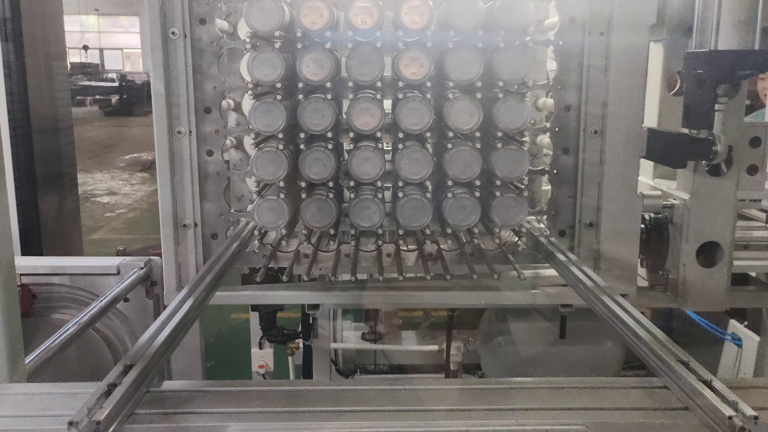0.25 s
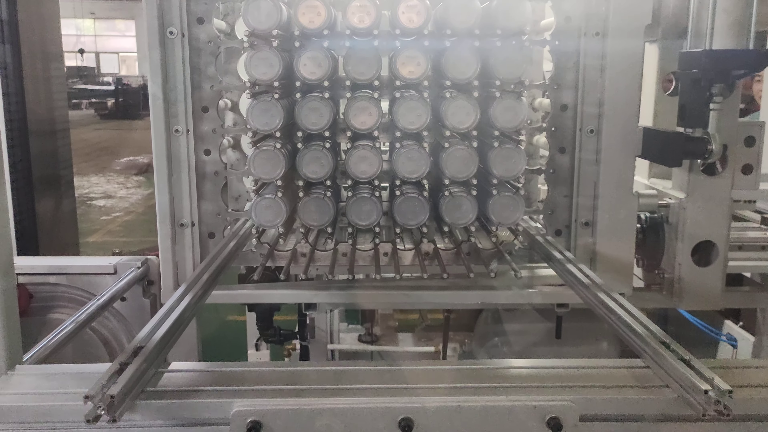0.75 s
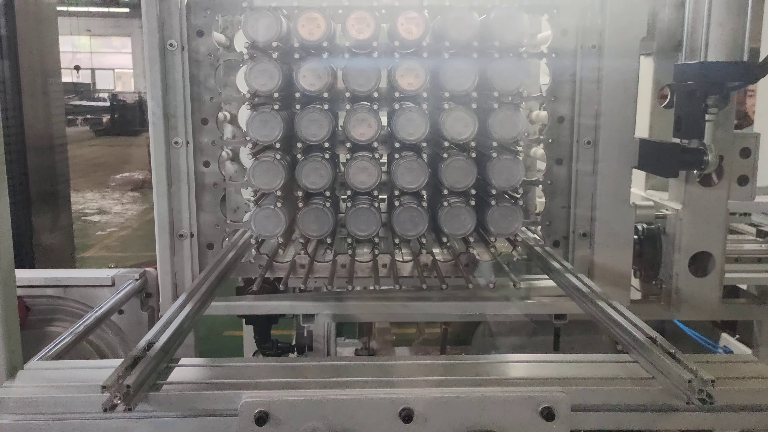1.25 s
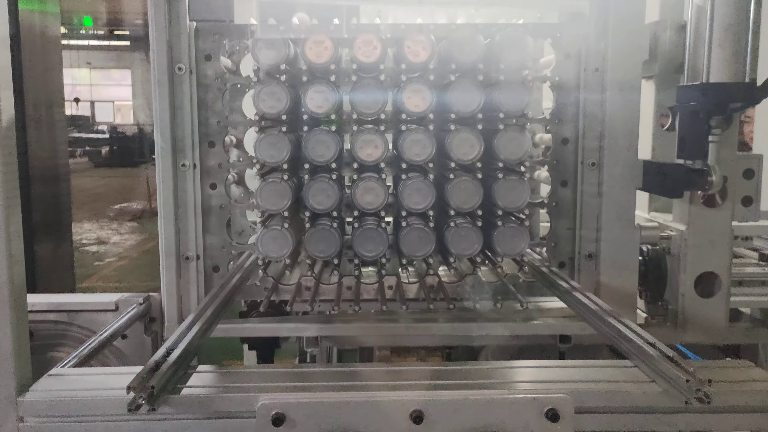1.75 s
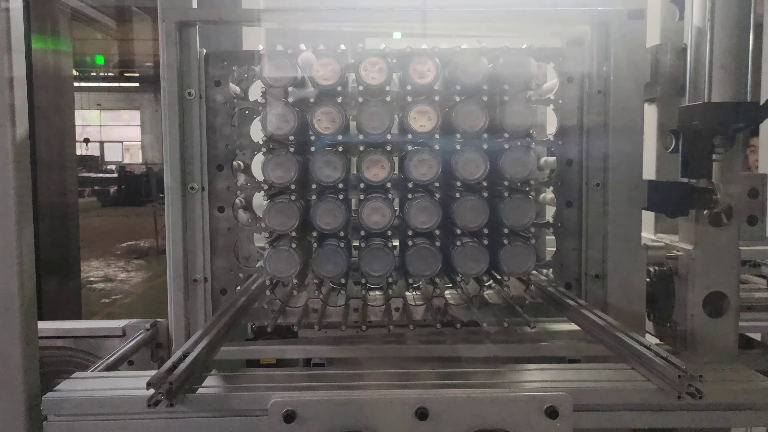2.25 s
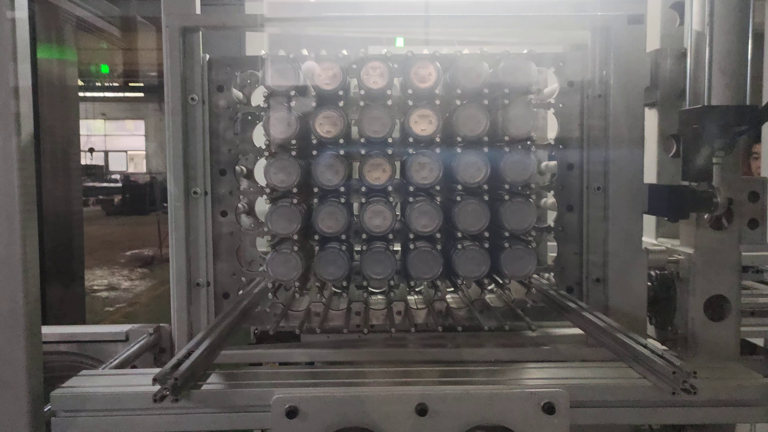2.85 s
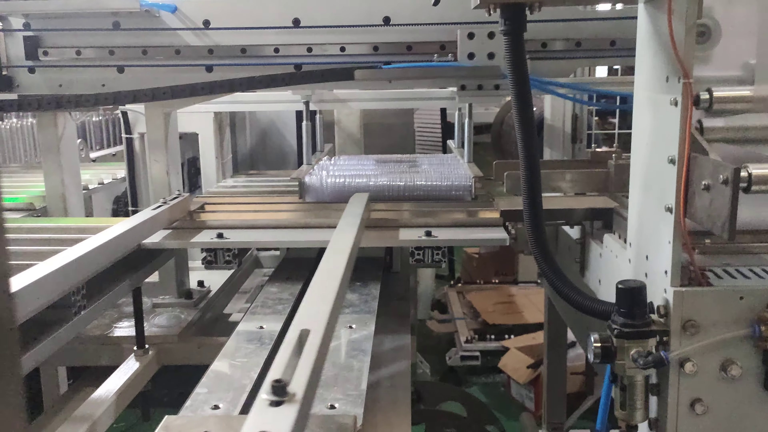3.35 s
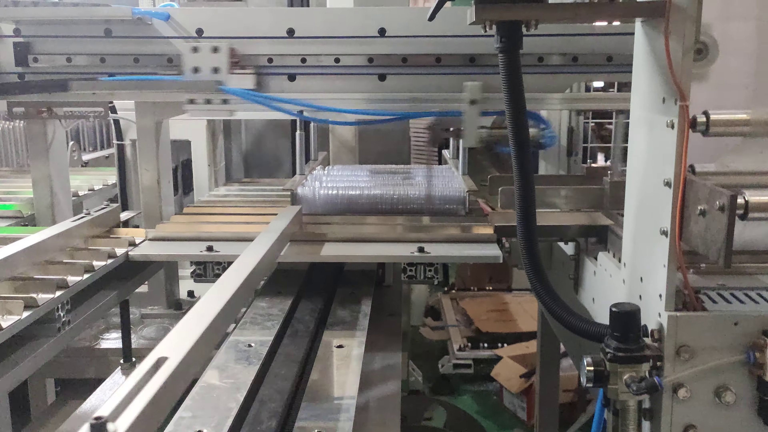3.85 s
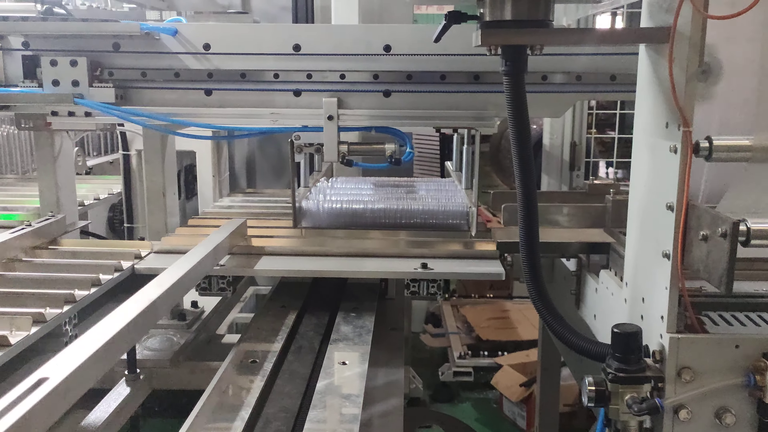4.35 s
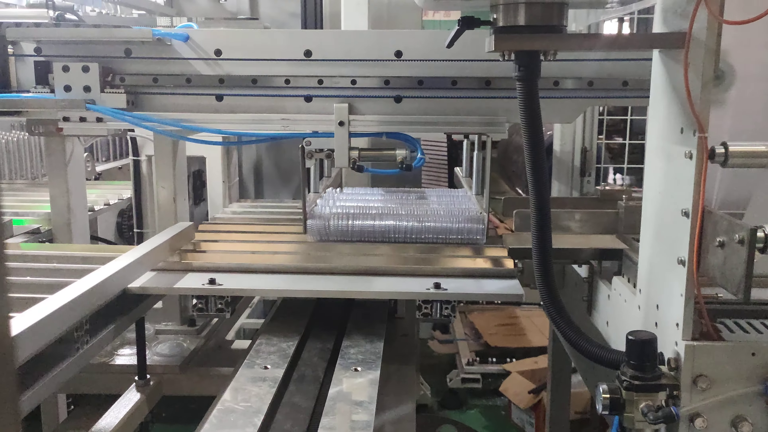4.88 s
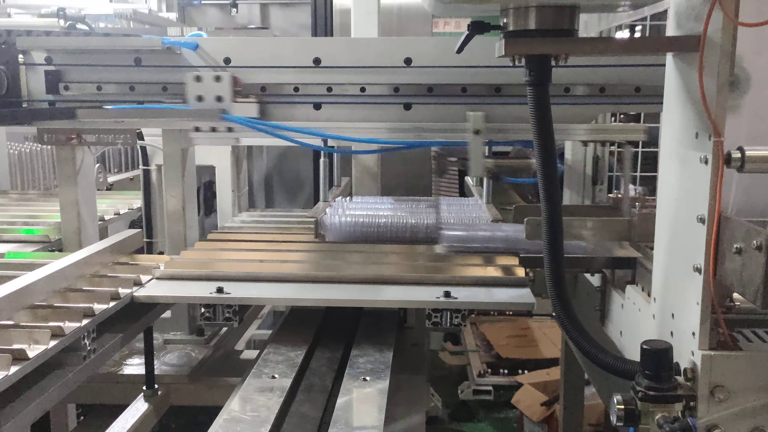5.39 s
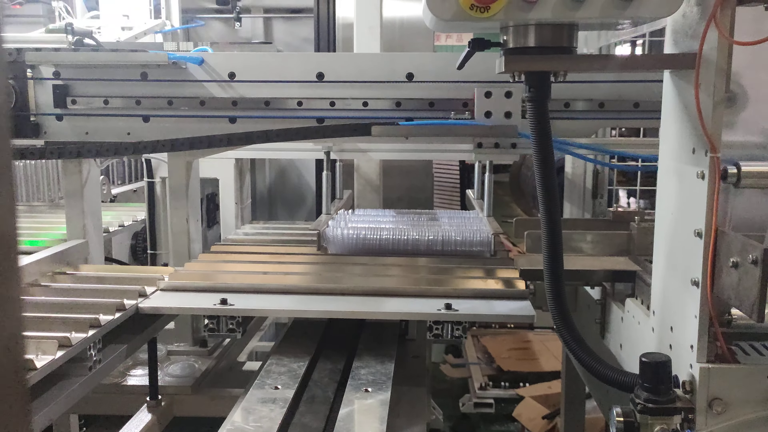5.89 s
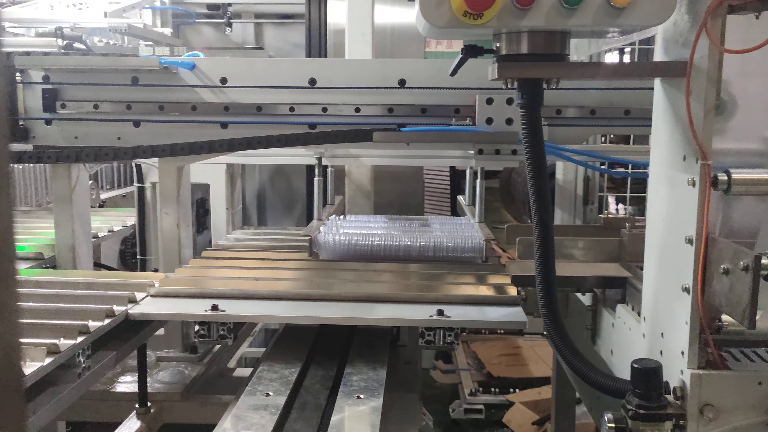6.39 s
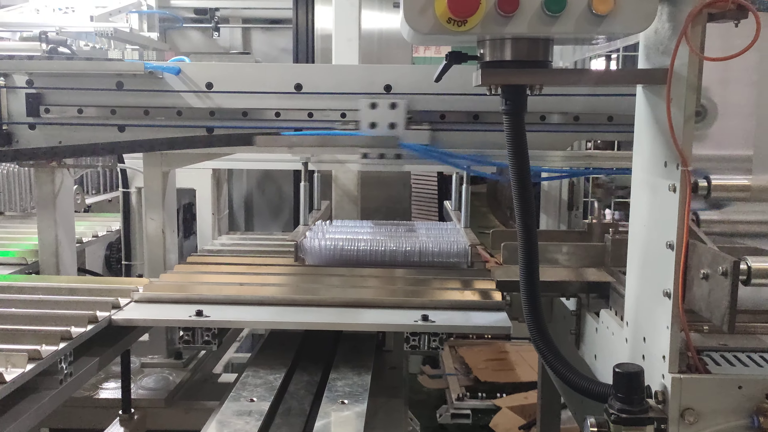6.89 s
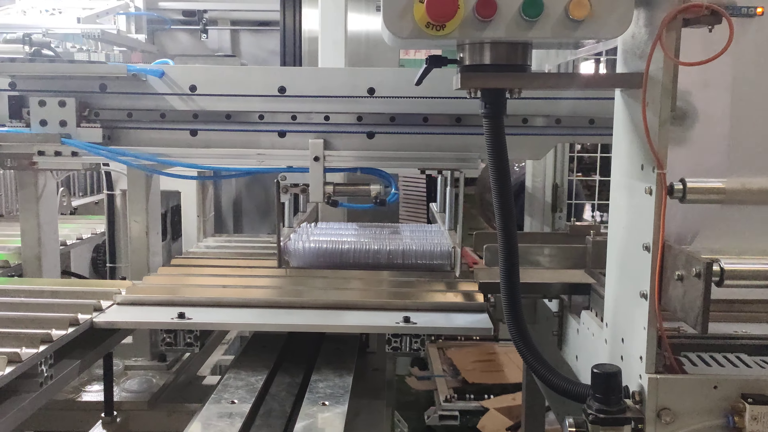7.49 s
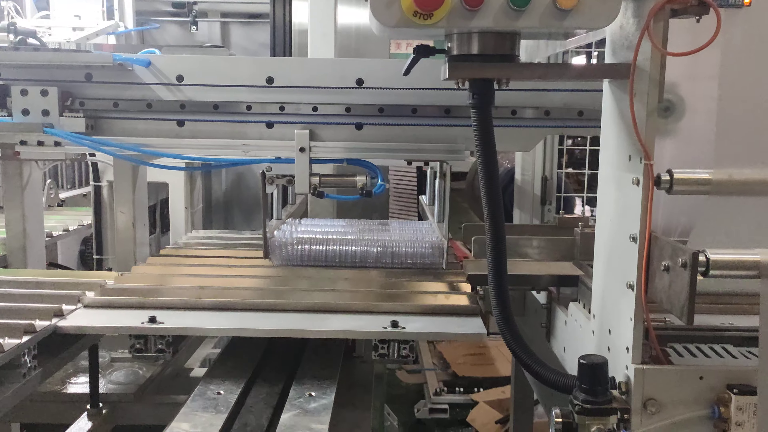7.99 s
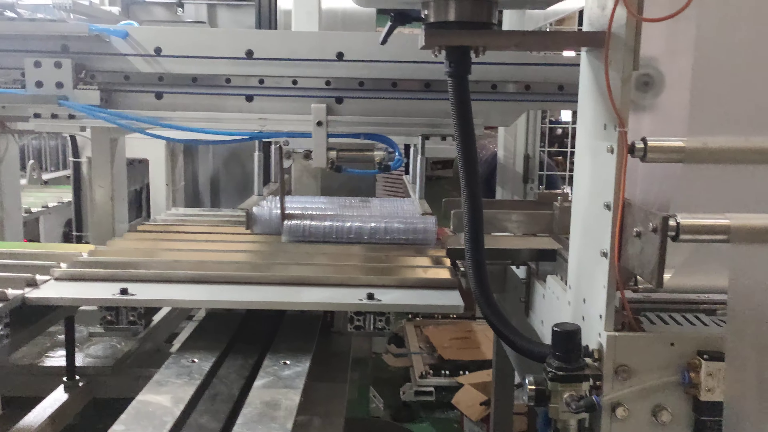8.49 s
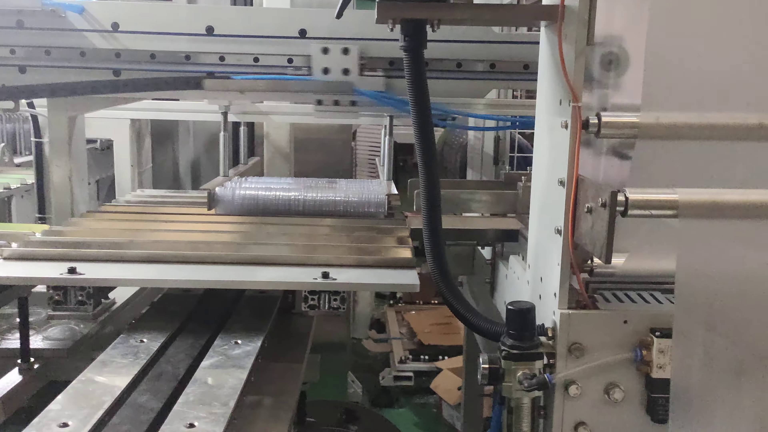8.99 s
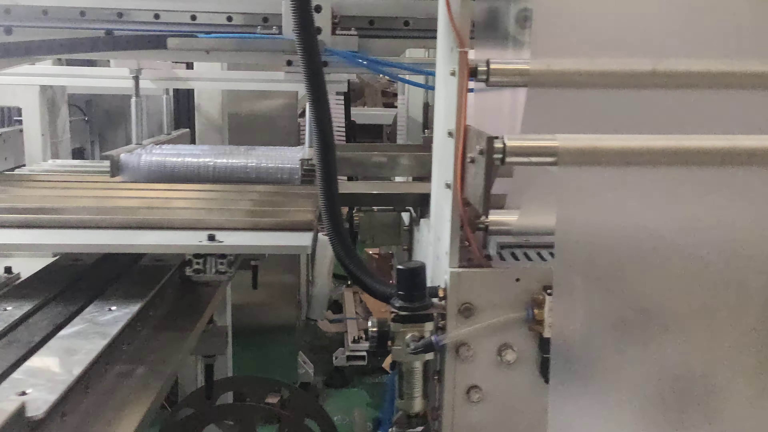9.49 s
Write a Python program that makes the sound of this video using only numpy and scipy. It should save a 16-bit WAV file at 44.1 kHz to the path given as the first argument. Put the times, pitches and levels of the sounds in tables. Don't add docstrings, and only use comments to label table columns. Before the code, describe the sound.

Pneumatic factory machine stacking plastic cups: air jets hiss, guides scrape, metal strokes clank over a hall roar, with a half-second silence early on.

```python
import sys
import numpy as np
from scipy import signal
from scipy.fft import rfft, irfft, next_fast_len
from scipy.io import wavfile
from scipy.ndimage import uniform_filter1d, map_coordinates

SR = 44100
rng = np.random.default_rng(int(sys.argv[2]) if len(sys.argv) > 2 else 0)


def makeup_ratio(level_db):
    decades = np.asarray(level_db, float) / 20
    return 10 ** decades


def to_wav(s):
    ch = np.atleast_2d(s).T
    pcm = np.round(np.clip(ch, -1, 1) * 32767)
    wavfile.write(sys.argv[1], SR, pcm.astype(np.int16))


N = 429534
T = np.arange(N) / SR

# (from t/s, to t/s)
CUT = (2.5215, 3.0085)

# (t/s, open/s, level/dB)
BLOWS = [
    (1.74, .29, -24),
    (3.055, 0.33, -22),
    (3.975, .33, -20.5),
    (6.372, 0.31, -23),
    (7.275, 0.33, -21.5),
    (8.195, 0.24, -29),
    (9.645, .3, -22.5),
]
OPEN_S, SHUT_T60 = 0.013, .45
SURGE_DB, SURGE_S, SAG_DB_PER_S = 1, 0.076, 3.5
HALL_DB, HALL_T60 = -16, 3.2
# (t/s, run-up/s, level/dB, t60/s)
VENTS = [(-.01, 0.028, -26, 1.64), (.78, .06, -38, 1.8), (.88, 0.21, -29.5, 1.2),
         (1.355, 0.027, -34.5, 1.7), (1.49, .13, -24.5, 0.85), (1.68, 0.052, -27, 0.84),
         (1.79, 0.031, -29, .6), (2.025, 0.012, -21.5, 1.5), (2.25, .02, -32, 1.6), (3.01, 0.017, -33, .3),
         (3.3, 0.092, -21, 2.34), (3.765, 0.038, -28, 2.2), (4.96, 0.027, -26, 1.85),
         (5.365, 0.013, -25, 0.24), (5.4, 0.15, -31.5, 4.7), (5.53, 0.078, -21.5, 2.8),
         (5.975, .035, -29, 1.1), (7.735, 0.034, -28, 1.1), (7.77, 0.02, -21, 1.77),
         (8.665, 0.012, -29, 0.28), (6.352, .015, -24, 0.45), (6.15, .05, -41, 1.5), (7.15, 0.086, -37, 1),
         (8.75, 0.071, -39, 6.6), (8.895, 0.026, -42, .6), (8.97, 0.02, -29.5, 0.9),
         (9.125, 0.012, -28, 0.37)]
# (f/Hz, level/dB per Hz)
JET_COLOURS = [
    [(2120, -42.5), (3600, -5), (3980, -11.5), (4060, -5.5), (4690, -4.5), (5340, 0.5), (6850, 0),
     (8260, -4.5), (9130, -10), (9950, -16), (11300, -15), (14700, -50), (22000, -120)],
    [(2120, -30), (3600, -6), (3910, -14.5), (4100, -12), (4820, -8), (6040, -5), (7360, -0.5), (8100, -3),
     (9860, -13.5), (10800, -13), (11300, -12.5), (14700, -45.5), (22000, -120)],
]
# (f/Hz, width/Hz, level/dB)
NOZZLES = [
    (6770, 68, -2.5),
    (7440, 330, -5),
    (8160, 190, -4.5),
]

# (t/s, hold/s, low panels level/dB, high panels level/dB, t60/s)
STROKES = [
    (3.371, 0.12, -23, -21.5, 0.89),
    (4.259, 0.073, -25.5, -22.5, 0.46),
    (5.568, 0.084, -22.5, -20.5, 0.64),
    (5.829, 0.039, -30, -28, .4),
    (7.561, 0.086, -27.5, -21, 0.29),
    (7.774, 0.12, -25, -22, 0.86),
    (9.138, 0.045, -26, -26.5, 0.33),
    (9.42, .2, -34, -31.5, 0.76),
]
# (f/Hz, width/Hz, level/dB)
PANELS = [
    [(266.5, 120, -2), (347, 162, -2)],
    [(832, 182, 1), (944, 156, -1.5), (1065, 210, -11)],
]
# (t/s, peak level/dB)
KNOCKS = [(3.062, -17), (3.381, -7), (3.427, -8), (3.496, -8), (3.534, -11), (4.057, -21), (4.277, -6),
          (5.584, -8), (5.659, -8), (5.84, -9), (6.376, -12), (6.79, -12), (7.573, -8), (7.693, -11),
          (7.791, -6), (7.839, -10), (7.919, -10), (8.436, -11.5), (8.674, -17), (8.983, -11.5),
          (9.142, -11), (9.358, -16)]

# (t/s, run-up/s, level/dB, t60/s)
SLIDES = [(-.02, 0.038, -22.5, 1.94), (.9, 0.19, -22, 1.7), (1.1, 0.073, -36, 1), (1.3, 0.12, -33, 6.1),
          (1.57, .05, -22, 0.36), (1.71, 0.025, -22.5, 0.63), (1.77, 0.055, -23, 4.3),
          (2.24, 0.018, -27, 0.53), (3.015, 0.044, -27, 4.9), (3.31, 0.05, -25, 1.3), (3.43, 0.13, -24, 3),
          (3.88, .27, -30, 4.5), (4.255, 0.033, -22, 0.85), (4.85, 0.25, -28, 2.7), (5.34, 0.021, -30, 1.3),
          (5.53, 0.032, -27, 1.2), (5.55, 0.22, -23.5, 3.9), (5.835, 0.015, -24, 0.37),
          (6.15, .3, -28.5, 1.6), (7.1, 0.23, -28.5, 3.7), (7.56, 0.079, -22.5, 0.38),
          (7.74, 0.031, -25.5, 3.5), (7.9, .25, -29.5, 2.4), (8.66, .022, -34, .3),
          (8.885, 0.06, -30.5, .9), (9.125, 0.033, -24, .5), (9.3, .12, -31.5, 4), (9.645, 0.014, -28, 2.9)]
GLIDE_DB = -34
# (f/Hz, level/dB per Hz)
SCRAPE_COLOURS = [
    [(710, -29.5), (1200, -6), (1700, -2.5), (1890, -3.5), (2090, -2), (2970, -9), (3680, -19), (4300, -28),
     (5590, -33.5), (9460, -120)],
    [(710, -14.5), (1200, -6), (1540, -4), (2090, 0), (2750, -5.5), (3150, -6.5), (3910, -17), (4300, -17),
     (5590, -26), (9460, -120)],
]
# (t/s, from f/Hz, to f/Hz, glide/s, attack/s, level/dB, t60/s)
SQUEAK = (.397, 900, 770, .012, .012, -13, .26)

# (t/s, level/dB, centre f/Hz, width/Hz, t60/s)
CLACKS = [(.61, -19, 450, 80, 0.14), (.33, -20, 400, 80, .15), (1.629, -9, 7650, 1810, 0.14),
          (1.63, -17, 12000, 8000, 0.18), (2.035, -7.5, 8140, 2190, 0.097), (2.055, -13.5, 7670, 1596, 0.1),
          (4.27, -12.5, 893, 625, 0.28), (5.379, -10, 4630, 6200, 0.029), (5.575, -13, 7800, 2500, 0.17),
          (5.848, -12, 2030, 2520, 0.089), (7.57, -14.5, 955, 890, 0.17), (8.205, -22, 600, 1200, 0.18),
          (8.675, -16, 6500, 7860, 0.081), (8.914, -21, 5600, 5000, .06), (8.91, -22, 5400, 300, .08),
          (8.975, -19, 900, 2480, 0.085), (9.142, -11, 2200, 2870, 0.1)]
# (t/s, peak level/dB)
TICKS = [(1.065, -16), (1.1438, -15), (1.5918, -21), (1.6192, -15), (2.0363, -13), (2.2124, -16),
         (2.2832, -14), (3.0859, -17), (3.1472, -14), (3.5319, -15), (4.2707, -13), (4.6274, -18),
         (5.8491, -9), (7.5732, -7), (7.6331, -9), (7.7952, -24), (8.9141, -18), (9.6555, -15)]
# (t/s, level/dB, f/Hz, t60/s)
THUDS = [(1.82, -19, 81, 0.18), (2.043, -13.5, 95, 0.13), (2.17, -23, 91, .15), (3.45, -26, 84.6, 0.53),
         (3.779, -21.5, 85.2, 0.15), (4.32, -30.5, 82.6, .3), (5.701, -20, 86, 0.18),
         (5.998, -17, 85, 0.12), (7.899, -17, 89, 0.16), (8.22, -18.5, 87, 0.14), (9.2, -29, 85, 0.14)]

# (from t/s, to t/s, f/Hz, width/Hz, level/dB)
WHINES = [(0.0, 1.16, 1020, 70, -39), (0.0, 2.52, 2085, 80, -45.5), (1.542, 1.63, 7440, 300, -33),
          (1.719, 2.1, 2530, 605, -28), (1.77, 1.83, 1700, 40, -26), (1.87, 2.12, 1675, 35, -29),
          (1.802, 2.37, 2090, 45, -36), (1.802, 2.1, 2890, 360, -29), (1.885, 1.92, 2730, 80, -30),
          (2.03, 2.24, 2454, 80, -34.5), (1.04, 1.2, 149, 8, -35), (2.035, 2.16, 7470, 130, -27),
          (2.035, 2.055, 8320, 100, -28), (3.012, 3.035, 6500, 120, -34), (3.062, 3.1, 7330, 130, -29),
          (3.062, 3.27, 8050, 120, -29), (5.575, 5.6, 7750, 100, -30), (5.575, 5.84, 7400, 150, -32),
          (6.355, 6.07, 6800, 100, -26), (7.285, 7.2, 7000, 210, -30), (7.785, 7.83, 7720, 200, -28),
          (2.06, 2.4, 352, 14, -36), (3.008, 6.4, 2090, 40, -38.5), (3.008, 4.6, 3150, 200, -36),
          (4.6, 6.3, 3180, 134, -38), (4.298, 4.9, 2500, 70, -40), (4.302, 5.6, 3505, 60, -47.5),
          (3.01, 8.2, 267.7, 45, -41), (9.3, 9.3, 344, 121, -31), (9.645, 9.4, 3130, 1300, -28),
          (9.135, 9.2, 2170, 2500, -34.5)]
# (f/Hz, level/dB)
HUM = (168, -33)

# (f/Hz, level/dB per Hz)
LEAK_COLOUR = [(2120, -30), (3600, -6.5), (4000, -7), (4490, -8), (5620, -5.5), (6400, 0), (7080, -1.5),
               (7500, 1), (9090, -9.5), (9720, -15.5), (11300, -16.5), (14700, -54.5), (22000, -120)]
# (t/s, run-up/s, level/dB, t60/s)
SURGES = [
    (1.0, 0.14, -29.5, 2),
    (7.55, 0.027, -25, 1.7),
    (1.53, 0.066, -25, 1.75),
    (1.95, 0.16, -27, 2),
    (4.9, .26, -29, 1.5),
    (6.68, 0.13, -27, 3),
    (7.13, 0.045, -31, 3.7),
    (8.9, .1, -30, 0.27),
    (9.35, 0.22, -26.5, 2),
]
ROAR_DB, ROAR_FOLLOWS = -26, 0.32
# (f/Hz, level/dB per Hz)
ROAR_COLOURS = [
    [(18, -92.5), (30, -51), (70, -23), (94, -15), (140, -13), (185, -3.5), (302, -4.5), (361, -6.5),
     (874, -10), (1010, -7), (1500, -19), (1950, -37.5), (3300, -120)],
    [(18, -62), (30, -111), (49, -29), (125, -11.5), (159, -6), (194, -4), (269, -3.5), (439, -7),
     (846, -8), (1500, -14.5), (1950, -24), (3300, -120)],
]

# (f/Hz, correlation)
ALIKE = [(60, 0.32), (170, 0.91), (260, 0.96), (430, 0.76), (860, 0.4), (1200, 0), (1720, -.4),
         (2400, 0.11), (3800, -.25), (5500, 0.066), (6500, 0.0047), (8600, -.15), (10300, 0.15)]
# (f/Hz, level/dB)
LEAN = [
    [(60, 16), (100, 25), (200, -0.5), (700, -1), (1200, -4), (2400, -8.5), (3800, -3.5), (5500, -8),
     (6500, -9.5), (7600, -1.5), (8600, -2), (10500, -3)],
    [(60, 0), (100, 25), (200, -1.5), (700, -2), (1200, -2.5), (3100, -6.5), (4500, -3), (6500, -8.5),
     (7600, -8), (8600, 0), (10500, -4.5)],
]
# (t/s, size, build-up/s, build-up share)
POPS = [
    (1.64, 1.15, .006, .55),
    (1.6553, -1.4, .004, .15),
    (1.6902, -1.25, .002, .13),
    (1.7302, 1.4, .002, .15),
    (1.79, -.3, .002, .2),
]
# (t/s, level/dB)
DEAF = [
    (1.654, 2),
    (1.661, -9),
    (1.671, -36),
    (1.679, -22),
    (1.687, -18),
    (1.691, 1),
    (1.729, -2.5),
    (1.733, -27.5),
    (1.76, -13),
    (1.795, 2),
]

# (f/Hz, level/dB)
DROPOUT_DEPTH = [(30, 39), (150, 21), (1000, 13.5), (2900, 11), (3900, 4), (4600, 4.5), (5300, 10), (8200, 10),
                 (9000, 4), (9900, 1.5), (10800, 2.5), (11500, 6)]
# (t/s, length/s, low f/Hz, high f/Hz)
TOP_SPURTS = [(1.612, .05, 13600, 15700), (1.63, .03, 12500, 15700), (2.02, .04, 12400, 14300),
              (2.25, .02, 12800, 13200), (3.18, .03, 12600, 13400), (4.96, .02, 12800, 13300),
              (6.35, .02, 12700, 13400), (6.4, .04, 13200, 14300), (6.49, .02, 13800, 14100),
              (6.535, .02, 13100, 13500), (6.6, .03, 13100, 14300), (6.66, .03, 13900, 14300),
              (7.3, .02, 13800, 14300), (7.515, .04, 12900, 13500), (8.75, .02, 12900, 13300),
              (9.67, .05, 12600, 13600)]
TOP_HZ, GRID = 11550, 75


def air_jets():
    blow = np.hypot(held(BLOWS), swells(VENTS, idle_db=-57.5))
    air = patchy(placed(JET_COLOURS, flutter_db=0.85, rate=200, peaks=NOZZLES), depth_db=1.4)
    return makeup_ratio(-0.07 + .6 * wobble(15)) * blow * air


def press_frame():
    out = np.zeros((2, N))
    for k, panels in enumerate(PANELS):
        shake = np.zeros(N)
        for row in STROKES:
            start, hold, level_db, t60 = row[0], row[1], row[2 + k], row[4]
            fall_db = 60 * np.maximum(T - start - hold, 0) / t60
            shake += makeup_ratio(level_db - fall_db) * np.clip((T - start) / 0.0086, 0, 1)
        out += shake * diffuse(lambda f: ring(f, panels), LEAN[1], flutter_db=1.5, rate=50)
    return out


def frame_knocks():
    panels = [panel for group in PANELS for panel in group]
    return struck(KNOCKS, lambda f: ring(f, panels), gain_db=-8.5, t60=0.1)


def slides():
    scrape = patchy(placed(SCRAPE_COLOURS, flutter_db=0.5, rate=75), depth_db=0.73)
    return makeup_ratio(0.51 + .6 * wobble(16)) * swells(SLIDES, GLIDE_DB) * scrape


def guide_squeak():
    out, t = np.zeros((2, N + SR)), np.arange(SR // 4) / SR
    s, start, end, glide, attack, db, t60 = SQUEAK
    hz = end + (start - end) * np.exp(-t / glide) + 8 * wobble(50, len(t))
    tone = np.sin(2 * np.pi * np.cumsum(hz) / SR)
    add_at(out, s, makeup_ratio(db - 60 * t / t60) * (1 - np.exp(-t / attack)) * tone)
    return out[:, :N]


def clacks():
    out, t = np.zeros((2, N + SR)), np.arange(SR // 2) / SR
    pan_db = -3.5 * np.array([[.5], [-.5]])
    for s, db, hz, width, t60 in CLACKS:
        colour = lambda f: resonance(f, hz, width) ** 2 / (1 + (f / 11000) ** 8)
        rattle = filtered(rng.standard_normal((2, len(t))), colour)
        shape = makeup_ratio(db - 60 * t / t60 + pan_db) * (1 - np.exp(-t / .006))
        add_at(out, s, shape * rattle / np.std(rattle))
    return out[:, :N]


def metal_ticks():
    return struck(TICKS, lambda f: resonance(f, 2690, 2200) ** 2, gain_db=-9, t60=0.056)


def floor_thuds():
    out, t = np.zeros((2, N + SR)), np.arange(SR // 2) / SR
    for s, db, hz, t60 in THUDS:
        thud = makeup_ratio(db - 60 * t / t60) * np.sin(2 * np.pi * hz * t) * (1 - np.exp(-t / 0.014))
        add_at(out, s, thud * makeup_ratio([[6], [-20]]))
    return out[:, :N]


def drive_whines():
    out = np.zeros((2, N))
    for start, end, hz, width, db in WHINES:
        if end <= start:
            continue
        part = slice(round(start * SR), min(round(end * SR), N))
        on = np.clip(np.minimum(T[part] - start, end - T[part]) / 0.0098, 0, 1)
        lean = LEAN[int(start > CUT[0])]
        whine = diffuse(lambda f: resonance(f, hz, width) ** 2, lean, 0, 1, len(on))
        out[:, part] += makeup_ratio(db) * on * whine
    return out


def drive_hum():
    hz, db = HUM
    phase = 2 * np.pi * np.cumsum(hz + .4 * wobble(3)) / SR
    hum = makeup_ratio(db + .6 * wobble(4.2)) * np.sin(phase) * (T < CUT[0])
    return hum * makeup_ratio([[2.5], [-2.5]])


def far_leaks():
    level_db = np.where(T < CUT[1], -42, -36)
    return makeup_ratio(level_db) * placed([LEAK_COLOUR, LEAK_COLOUR], flutter_db=2.0, rate=25)


def hall_roar():
    work = swells(SLIDES, GLIDE_DB)
    follow = (work / work.mean()) ** ROAR_FOLLOWS
    level = swells(SURGES, ROAR_DB) * follow * makeup_ratio(0.77 * wobble(18))
    return level * placed(ROAR_COLOURS, flutter_db=0.5, rate=28)


def along(points, hz):
    f, v = np.transpose(points)
    return np.interp(np.log(hz + 1), np.log(f + 1), v)


def wobble(rate, size=N):
    return map_coordinates(rng.standard_normal(int(size * rate / SR) + 4), [T[:size] * rate])


def filtered(x, response):
    m = next_fast_len(x.shape[-1] + 8192)
    return irfft(rfft(x, m) * response(np.fft.rfftfreq(m, 1 / SR)), m)[..., :x.shape[-1]]


def resonance(f, hz, width):
    return 1j * f * width / (hz * hz - f * f + 1j * f * width + 1e-9)


def ring(f, panels):
    return sum(makeup_ratio(db) * resonance(f, hz, width) ** 2 for hz, width, db in panels)


def diffuse(colour, lean, flutter_db, rate, size=N):
    def ports(f):
        alike, tilt = np.clip(along(ALIKE, f), -.99, .99), makeup_ratio(along(lean, f) / 2)
        turn = np.arccos(alike) / 2
        middle = np.sqrt(tilt ** 2 + tilt ** -2 + 2 * alike)
        left = [tilt * np.cos(turn), tilt * np.sin(turn)]
        right = [np.cos(turn) / tilt, -np.sin(turn) / tilt]
        return colour(f) / middle * np.array([left, right])
    noise = makeup_ratio(flutter_db * wobble(rate, size)) * rng.standard_normal((2, size))
    pair = filtered(noise, ports).sum(axis=1)
    return pair / np.std(pair.mean(axis=0))


def placed(colours, flutter_db, rate, peaks=()):
    cut = round(CUT[1] * SR)

    def lift(f):
        return 1 + sum(makeup_ratio(db) * np.abs(resonance(f, hz, width)) ** 2 for hz, width, db in peaks)

    places = []
    for points, lean, size in zip(colours, LEAN, (cut, N - cut)):
        places.append(diffuse(lambda f: makeup_ratio(along(points, f)) * lift(f), lean, flutter_db, rate, size))
    return np.hstack(places)


def patchy(x, depth_db):
    z = signal.stft(x, nperseg=512)[2]
    field = uniform_filter1d(rng.standard_normal(z.shape[1:]), size=9, axis=0)
    field = uniform_filter1d(field, size=16, axis=1)
    return signal.istft(z * makeup_ratio(depth_db * field / field.std()), nperseg=512)[1][:, :N]


def heard(s):
    return T - s, (T < CUT[1]) == (s < CUT[0])


def swells(rows, idle_db):
    power = makeup_ratio(2 * idle_db) + np.zeros(N)
    for s, run_up, db, t60 in rows:
        u, here = heard(s)
        rise = np.sin(np.pi / 2 * np.clip(u / run_up, 0, 1)) ** 2
        fall = makeup_ratio(db - 60 * np.maximum(u - run_up, 0) / t60)
        power += here * (rise * fall) ** 2
    return np.sqrt(power)


def held(rows):
    power = np.zeros(N)
    for s, length, db in rows:
        u, here = heard(s)
        shut = np.maximum(u - length, 0)
        surge_db = SURGE_DB * np.exp(-np.abs(u - OPEN_S) / SURGE_S)
        flow_db = db + surge_db - SAG_DB_PER_S * np.clip(u, 0, length)
        tail = makeup_ratio(-120 * shut / SHUT_T60) + makeup_ratio(2 * HALL_DB - 120 * shut / HALL_T60)
        power += here * (np.clip(u / OPEN_S, 0, 1) ** 2 * makeup_ratio(flow_db)) ** 2 * tail
    return np.sqrt(power)


def add_at(out, s, sound):
    out[:, round(s * SR):][:, :sound.shape[-1]] += sound


def struck(rows, colour, gain_db, t60):
    out, t = np.zeros((2, N + SR)), np.arange(SR // 4) / SR
    for s, db in rows:
        shape = makeup_ratio(db + gain_db - 60 * t / t60) * (1 - np.exp(-t / .002))
        add_at(out, s, shape * diffuse(colour, LEAN[1], 0, 1, len(t)))
    return out[:, :N]


def scene():
    near = air_jets() + press_frame() + frame_knocks() + slides() + guide_squeak()
    contacts = clacks() + metal_ticks() + floor_thuds()
    return near + contacts + drive_whines() + drive_hum() + far_leaks() + hall_roar()


def port_pops():
    out = np.zeros(N)
    for s, size, build, share in POPS:
        u = T - s
        before = -share * np.exp(np.minimum(u, 0) / build)
        after = .72 * (1 - u / .0022) * np.exp(-np.abs(u) / .0016)
        out += size * np.where(u < 0, before, after)
    return filtered(out, lambda f: 1 / (1 + (f / 3000) ** 2))


def band_dropouts(x, size=1024):
    n, k = np.arange(2 * size) + .5, np.arange(size) + .5
    window = np.sin(np.pi * n / size / 2)
    basis = window * np.cos(np.pi / size * np.outer(k, n + size / 2)) * np.sqrt(2 / size)
    padded = np.pad(x, ((0, 0), (size + GRID, 2 * size - (N + GRID) % size)))
    blocks = padded.reshape(2, -1, size)
    z = np.concatenate([blocks[:, :-1], blocks[:, 1:]], axis=2) @ basis.T
    hz = k * SR / size / 2
    band = np.unique(np.round(30 * np.log(k + 40)), return_inverse=True)[1]
    member = band[:, None] == np.arange(band[-1] + 1)
    own = np.sqrt(z ** 2 @ (member / member.sum(axis=0)))[..., band] + 1e-9
    masker = np.sqrt(np.abs(uniform_filter1d(z ** 2, size=150, axis=2))) + 1e-9
    whim = uniform_filter1d(rng.standard_normal((z.shape[1], band[-1] + 1)), size=2, axis=0)[:, band]
    threshold = masker ** .5 * own ** .4 * makeup_ratio(-3 + 6.5 * whim - along(DROPOUT_DEPTH, hz))
    body = (hz < TOP_HZ) & (own > threshold)
    at = (np.arange(z.shape[1])[:, None] * size - GRID) / SR
    spurt = np.zeros(whim.shape, bool)
    for s, length, low, high in TOP_SPURTS:
        now = (at > s) & (at < s + length + size / SR / 2)
        spurt |= now & (hz > low) & (hz < high)
    spurt &= whim > -.5
    back = (z * (body | spurt)) @ basis
    return (back[:, :-1, size:] + back[:, 1:, :size]).reshape(2, -1)[:, GRID:GRID + N]


def top_cut(x):
    return signal.sosfilt(signal.butter(12, 15700, fs=SR, output="sos"), x)


def record(dry):
    deaf = makeup_ratio(np.interp(T, *np.transpose(DEAF)))
    x = filtered(dry, lambda f: (1j * f / (55 + 1j * f)) ** 2)
    x = np.array([x[0] * deaf + port_pops(), x[1]])
    limited = x / (1 + np.abs(x / .93) ** 5) ** (1 / 5)
    playing = (T < CUT[0]) | (T > CUT[1])
    return top_cut(band_dropouts(limited) * playing)


dry = scene()
out = record(dry)
to_wav(out)
```